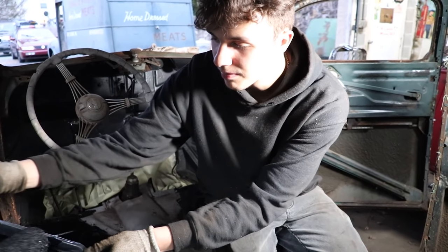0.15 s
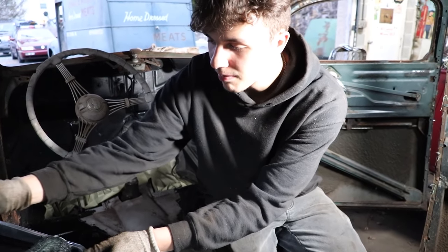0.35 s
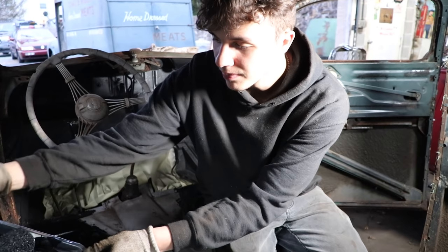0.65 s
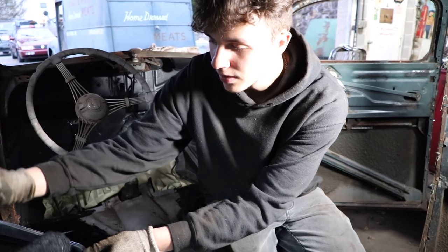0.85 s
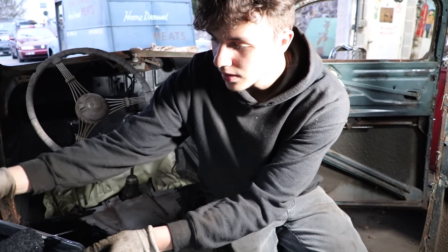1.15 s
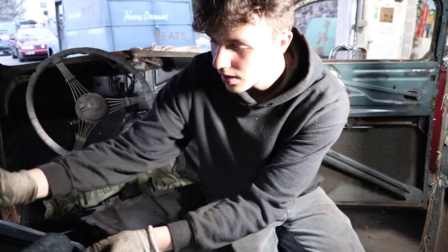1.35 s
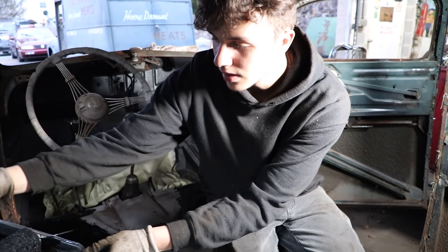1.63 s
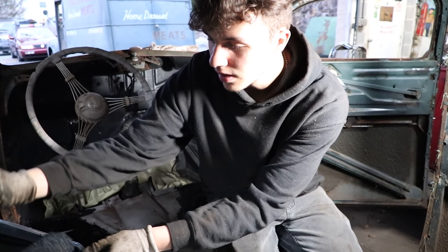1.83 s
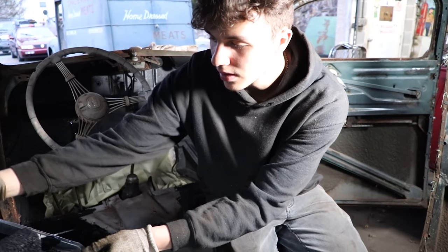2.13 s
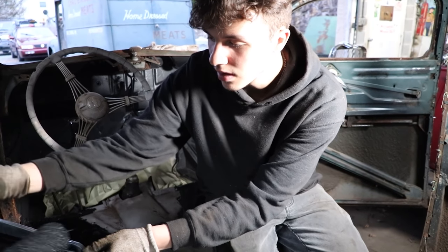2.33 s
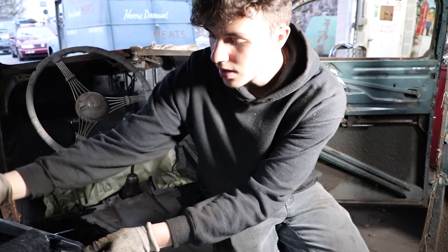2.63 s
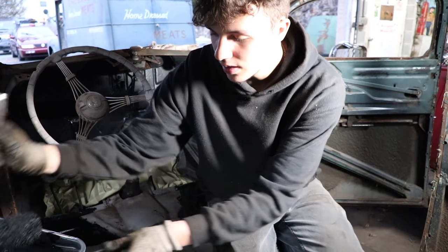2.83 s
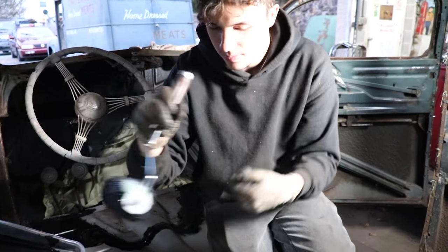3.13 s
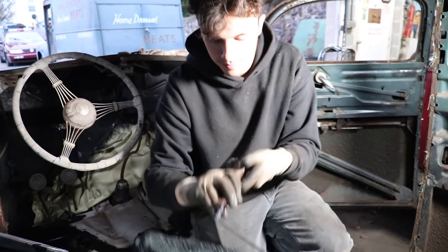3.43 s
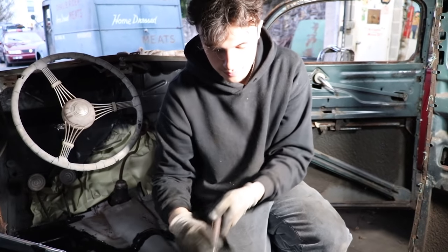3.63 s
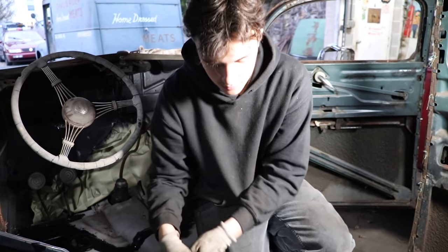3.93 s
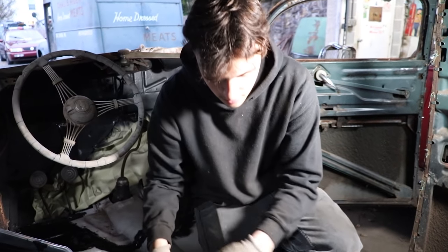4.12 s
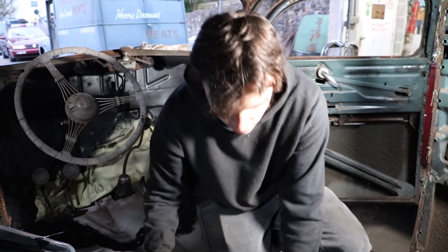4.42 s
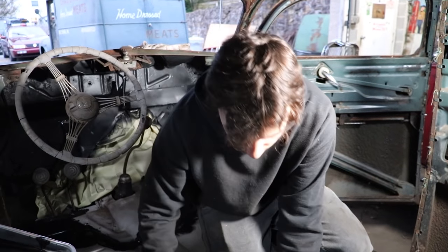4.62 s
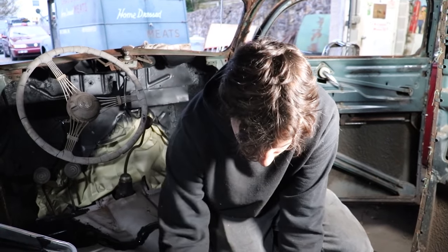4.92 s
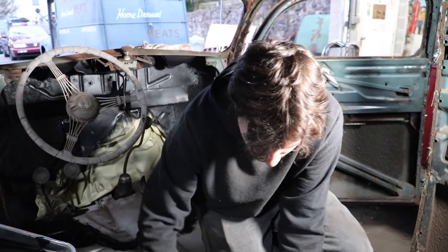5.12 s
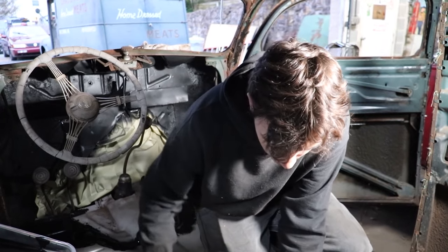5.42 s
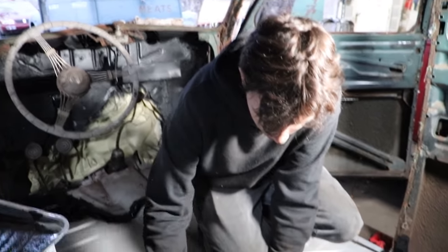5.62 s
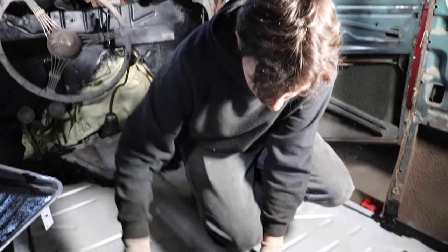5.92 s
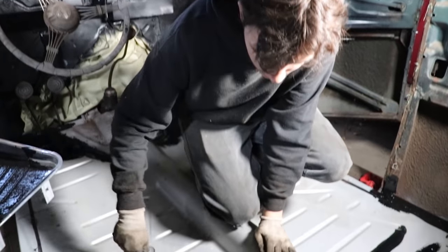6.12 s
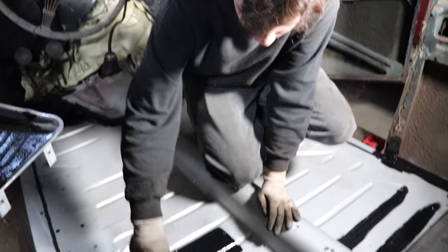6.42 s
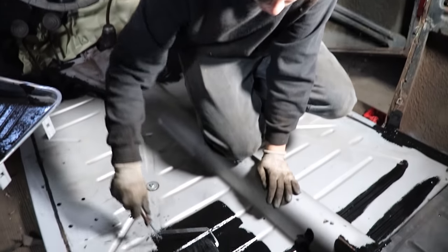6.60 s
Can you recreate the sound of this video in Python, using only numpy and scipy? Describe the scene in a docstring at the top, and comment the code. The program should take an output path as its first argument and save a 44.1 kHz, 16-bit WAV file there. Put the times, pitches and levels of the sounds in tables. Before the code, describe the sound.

A thick paint roller peels wetly back and forth in a plastic tray, knocks, lifts, then lands and rolls over booming ribbed sheet steel.

```python
"""In a garage, a thick-nap paint roller works in a plastic tray, is lifted, set down on a steel floor pan and rolled.
Wet nap peels with a tacky crackle of noise grains, and single paint threads snap as clicks a few cycles long.
The roller knocks on the tray and jolts on the steel: cracks and noise rattles ring each body's modes.
The steel pan booms over its ribs with rising twangs and deep modes; the axle squeaks faintly.
Behind them lie quiet air noise and a wavering hum; a short diffuse tail stands for the walls."""
import sys
import numpy as np
from scipy import signal
from scipy.io import wavfile

SR = 44100
rng = np.random.default_rng(int(sys.argv[2]) if len(sys.argv) > 2 else 0)


def transcribe(u):
    """Save the signal u as a 16-bit wav file named by the first command-line argument.

    u: samples, shape (n,) or (channels, n), limited to [-1, 1]; the rate is SR.
    q: integer samples, one column per channel.
    """
    v = np.clip(np.atleast_2d(u).T, -1, 1)
    q = np.round(v * 32767).astype(np.int16)
    wavfile.write(sys.argv[1], SR, q)


N = 298116  # length in samples

# The pan pops over a rib. Each row: time in seconds, level in dB before the twang's trim,
# share of the deep modes in dB over that level.
BOOMS = [(4.568, -27, -14), (4.879, -30, 1), (5.211, -34, -2), (5.304, -26.5, -4.5), (5.573, -15.5, -27),
         (5.672, -35.5, 8), (5.952, -39, -6), (6.083, -27, -6), (6.231, -12, -8.5), (6.301, -30, 0)]


def amp(db):
    """dB to gain."""
    return 10 ** (np.asarray(db) / 20)


def rms_one(x):
    """Scale to rms 1."""
    return x / np.sqrt(np.mean(x ** 2) + 1e-20)


def band(x, low, high):
    """Band-pass between two frequencies in Hz."""
    sos = signal.butter(2, [low, high], "band", fs=SR, output="sos")
    return signal.sosfilt(sos, x + 1e-18)


def drift(rate_hz):
    """Slow random wander of spread 1: noise through two equal one-pole smoothers."""
    step = 40  # drawn once every 40 samples, then interpolated
    r = np.exp(-2 * np.pi * step * rate_hz / SR)
    noise = rng.standard_normal(N // step + 2002)
    slow = signal.lfilter([1], [1, -2 * r, r * r], noise)[2000:]  # skip the filter's start-up
    return np.interp(np.arange(N) / step, np.arange(len(slow)), rms_one(slow))


def ring(x, hz, t60):
    """A damped resonance: a unit click starts a dying sine of height 1."""
    r = amp(-60 / (t60 * SR))
    w = 2 * np.pi * hz / SR
    return signal.lfilter([0, np.sin(w)], [1, -2 * r * np.cos(w), r * r], x + 1e-18)


def grains(per_s, spread_db):
    """Random clicks of uneven size and sign, scaled to rms 1."""
    sizes = amp(spread_db * np.minimum(rng.exponential(1, N), 5))
    signs = rng.choice([-1, 1], N)
    return rms_one(sizes * signs * (rng.random(N) < per_s / SR))


def coloured(source, spectrum, patchy_db):
    """Third-octave bands, neighbours on unrelated draws, each with its level and flicker; rms 1."""
    hz, db = np.transpose(spectrum)
    edges = 20 * 2 ** np.arange(0, 9.8, 1 / 3)
    out = 0
    for k, (low, high) in enumerate(zip(edges, edges[1:])):
        if hz[0] <= high and low <= hz[-1]:
            level_db = np.interp(np.log(low * high) / 2, np.log(hz), db)
            flicker_db = patchy_db * drift(13.0)
            out = out + amp(level_db + flicker_db) * band(source[k % 2], low, high)
    return rms_one(out)


def motion(table):
    """Power of peeling, treble, rumble and boom: each stroke speeds up, surges at its fastest and slows."""
    # Powers on the half sine of a stroke's speed, for peeling, treble, rumble and boom.
    roundness = [0.52, 0.72, 0.41, 0.32]
    surge_s = 0.023  # half width of the surge
    t = np.arange(N) / SR
    power = np.full((4, N), 1e-12)
    for start, fastest, stop, *levels_db, surge_db in table:
        phase = np.interp(t, [start, fastest, stop], [0, .5, 1])
        speed = np.sin(np.pi * phase).clip(0) ** np.array(roundness)[:, None]
        surge = amp(surge_db * np.exp(-((t - fastest) / surge_s) ** 2))
        power += (amp(levels_db)[:, None] * speed * surge) ** 2
    return power


def nap(peel_db, treble_db, rumble_db):
    """Fibres tear free of the paint in clumps; drag shakes the body below; in the tray small blisters burst."""
    # Spectra of peeling in the thick pool, of peeling on the steel, and of the shaken body.
    # Each row: frequency in Hz, relative level in dB per Hz.
    pool_spectrum = [(710, -33), (1200, 6), (1510, -20), (1660, -1.5), (3950, -1), (7570, -21),
                     (13500, -16), (16000, -49)]
    steel_spectrum = [(710, -49), (1200, -5), (1630, -5), (2680, 3), (4860, -10.5), (8910, -21.5),
                      (13300, -19.5), (16000, -42)]
    rumble_spectrum = [(150, -12), (250, -1), (289, -2.5), (531, -9), (826, 0), (1190, -10), (1700, -10),
                       (2210, -31), (3740, -120)]
    lift_s = 2.95  # the roller leaves the pool of paint

    clumps = amp(1.4 * drift(94.0))
    tearing = [clumps * grains(12000., spread_db=3.5) for _ in range(2)]
    in_tray = np.arange(N) < lift_s * SR
    pool_peel = coloured(tearing, pool_spectrum, patchy_db=3.5)
    steel_peel = coloured(tearing, steel_spectrum, patchy_db=1.4)
    peel = np.where(in_tray, pool_peel, steel_peel)
    low, treble = [signal.sosfilt(signal.butter(4, 6000, side, fs=SR, output="sos"), peel)
                   for side in ("low", "high")]

    blisters = sum(band(grains(130.0, spread_db=5.0), hz, 1.33 * hz) * 3000. / hz
                   for hz in (2560, 2800, 3430, 4930, 6170))
    blisters = amp(6.5) * rms_one(blisters) * in_tray
    # single fibres let go
    ticks = amp(-9.5) * rms_one(band(grains(250., spread_db=6.5), 4100.0, 14000.0))
    bright = rms_one(treble) + ticks + blisters

    dragging = [grains(3000., spread_db=3.0) for _ in range(2)]
    rumble = coloured(dragging, rumble_spectrum, patchy_db=1.5)
    return amp(peel_db) * rms_one(low) + amp(treble_db) * bright + amp(rumble_db) * rumble


def blows(table, bands, modes, ring_db, longest_s, loss_db):
    """A sharp crack and a dying rattle, coloured blow by blow, heard directly and through the body's modes."""
    # Factors on the rattle's t60, band by band from the lowest: highs die first.
    rattle_share = [2.3, 1.27, 1.3, 1.05, 0.92]
    # crack of a blow that rattles 0.1 s; the shorter the rattle, the harder the crack
    crack_at_tenth_db, crack_db_per_halving = 5, 3.5
    push = np.zeros((5, N + 16000))
    t = np.arange(16000) / SR
    rebound = SR // 940  # delay in samples
    for s, peak_db, low_db, mid_db, high_db, top_db, t60 in table:
        t60 = max(t60, .01)
        crack_db = crack_at_tenth_db - crack_db_per_halving * np.log2(t60 * 10)
        decay = amp(-60 * t / (t60 * np.array(rattle_share)[:, None]))
        rattle = decay * rng.standard_normal(len(t))
        # the softer the contact, the slower the rise
        rattle *= 1 - np.exp(-t / (0.00036 * amp(-crack_db)))
        # crack and quick rebound, in the middle bands
        rattle[1:4, [0, rebound]] = [5.5 * amp(crack_db), 0.87 * amp(crack_db)]
        band_db = np.array([[low_db], [0], [mid_db], [high_db], [top_db]])
        i = round(s * SR)
        push[:, i:i + len(t)] += amp(peak_db - loss_db + band_db) * rattle

    direct = 0
    for p, (low, high) in zip(push, bands):
        narrow_gain = np.sqrt(SR / 2 / (high - low))  # makes up for the width of the band
        direct = direct + narrow_gain * band(band(p[:N], low, high), low / 1.175, high * 0.95)
    # no contact is infinitely hard
    direct = signal.sosfilt(signal.butter(1, 6000., fs=SR, output="sos"), direct)
    ringing = sum(amp(db) * ring(direct, hz, min(t60, longest_s)) for hz, db, t60 in modes)
    return direct + amp(ring_db) * ringing


def shaking_after(table, loss_db, t60):
    """Power that swells after every blow and dies away."""
    rise_s = 0.0091  # time constant of the swell
    kicks = np.zeros(N)
    for s, peak_db, *_ in table:
        kicks[round(s * SR)] += amp(peak_db + loss_db) ** 2
    rise = np.exp(-1 / (rise_s * SR))
    dying = signal.lfilter([1], [1, -amp(-60 / (t60 * SR)) ** 2], kicks)
    return signal.lfilter([1 - rise], [1, -rise], dying)


def pan(boom_db):
    """The sheet shakes under the roller and pops over each rib: a rising twang, then the deep modes ring."""
    # Flexing modes of the sheet. Each row: frequency in Hz, relative level in dB, t60 in seconds.
    flex_modes = [(42, -10, 0.13), (60, -9, 0.26), (92, 0, 0.41), (120, 1, 0.059), (168.5, 1, 0.2),
                  (216.8, -8.5, 0.31)]
    twang, thump = np.zeros(N + 8000), np.zeros(N)
    t = np.arange(8000) / SR
    hz = 170. - 98.4 * np.exp(-t / 0.014)  # the sheet tightens as it springs back
    envelope = (1 - np.exp(-t / 0.015)) * amp(-60 * t / 0.19)
    shape = np.sin(2 * np.pi * np.cumsum(hz) / SR) * envelope
    for s, db, deep_db in BOOMS:
        i = round(s * SR)
        twang[i:i + len(t)] += amp(db + 0.5) * shape
        thump[i] = amp(db + deep_db)
    shaking = rng.standard_normal(N)
    out = twang[:N]
    for k, (hz, db, t60) in enumerate(flex_modes):
        shaken = amp(boom_db - 6.5) * rms_one(ring(shaking, hz, t60))
        popped = ring(thump, hz, t60) * (hz < 110)  # a pop rings the deep modes only
        out = out + (-1) ** k * amp(db) * (shaken + popped)
    return band(out, 25.0, 340.0)


def snaps():
    """Each parting paint thread is a click a few cycles long."""
    # Each row: time in seconds, level in dB before the trim, pitch in Hz.
    threads = [(0.0343, -40, 3870), (0.106, -32, 5430), (0.1324, -28, 3970), (0.6417, -25, 4150),
               (0.7475, -27, 9210), (1.1837, -26, 3800), (1.4717, -23.5, 5240), (1.5293, -26, 4160),
               (1.593, -19.5, 3680), (1.6585, -24, 4140), (1.841, -31, 5460), (1.848, -33, 4490),
               (2.085, -23.5, 3840), (2.4874, -34, 4070), (2.6257, -21, 3880), (2.723, -27, 4300),
               (2.777, -19.5, 4170), (3.6397, -23, 11500), (4.2223, -30.5, 6560), (4.6513, -26, 4070),
               (4.679, -21, 4700), (4.8209, -25, 5860), (5.7364, -23, 3900), (5.9444, -28, 4730),
               (6.667, -24, 4720), (6.6776, -18, 4700)]
    out = np.zeros(N + 400)
    t = np.arange(400) / SR
    for s, db, hz in threads:
        i = round(s * SR)
        cycles = t * hz
        click = cycles * np.exp(-cycles / 0.84) * np.sin(2 * np.pi * cycles)
        out[i:i + len(t)] += amp(db + 5.5) * click
    return out[:N]


def squeaks():
    """Dry rubbing at the axle: noise in a narrow resonance that swells and fades at one pitch."""
    # Each row: start in seconds, length in seconds, pitch in Hz, rms level at the top of the swell in dB.
    rubs = [(1.284, .06, 4570, -59), (1.907, .03, 5535, -56), (3.367, 0.1, 2190, -54),
            (3.99, 0.037, 460, -41), (4.125, .17, 4680, -61), (4.148, 0.037, 4000, -59),
            (3.7, .08, 2250, -58), (6.226, 0.022, 5400, -54)]
    out, t = np.zeros(N), np.arange(N) / SR
    for s, length, hz, db in rubs:
        swell = np.sin(np.pi * np.clip((t - s) / length, 0, 1))
        out += amp(db) * swell * rms_one(ring(rng.standard_normal(N), hz, 0.06))
    return out


def walls(x, t60, dull_hz):
    """A short diffuse tail: dying noise, duller than the direct sound."""
    t = np.arange(SR // 2) / SR
    tail = rng.standard_normal(len(t)) * amp(-60 * t / t60) * (t > .006)
    tail = signal.sosfilt(signal.butter(1, dull_hz, fs=SR, output="sos"), tail)
    return signal.fftconvolve(x, tail / np.sqrt(np.sum(tail ** 2)))[:N]


def garage():
    """Gently flickering air noise, and a hum: a low tone that wavers under noise in narrow resonances."""
    # Spectrum of the air. Each row: frequency in Hz, relative level in dB per Hz.
    air_spectrum = [(12, -39), (20, 6), (38, -8), (65, 2.5), (83, -25), (113, -20), (150, -6.5), (193, -3),
                    (241, -7.5), (472, -9.5), (873, -4), (1530, -20), (2820, -13.5), (7520, -33.5),
                    (14700, -30.5), (16000, -45)]
    # A far fan. Each row: frequency in Hz, resonance width in Hz, rms level in dB.
    fan = [(73.5, 23, -61.5), (141.3, 7.6, -56), (237.5, 9, -56.5), (364.6, 21, -63)]
    air = amp(-49.5) * coloured(rng.standard_normal((2, N)), air_spectrum, patchy_db=1.9)
    tone_hz = 69. + 1.19 * drift(2.7)
    tone = amp(-48.0 + 2.7 * drift(1.65)) * np.sin(2 * np.pi * np.cumsum(tone_hz) / SR)
    hum = sum(amp(db) * rms_one(ring(rng.standard_normal(N), hz, 2.04 / width)) for hz, width, db in fan)
    return air + tone + hum


def scene():
    """Strokes and blows drive the nap, the bodies and the pan; blows, snaps and squeaks reach the walls."""
    # Pushes out and back in the tray, then up to three to a stroke over the ribbed steel; and
    # the lifted roller rustling as it is carried. Each row: start, fastest point and stop in seconds,
    # then peeling, treble, rumble, boom of the pan (before its trim) and surge at the fastest point in dB.
    strokes = [(-.12, .05, 0.18, -49, -60.5, -52, -60, 1), (.21, .25, .37, -55, -75, -52, -58, 2),
               (.39, .47, 1.4, -50, -61, -60, -68, -0.5), (.73, .82, .9, -53, -71, -48.5, -55, -10),
               (.935, .99, 1.31, -49, -60, -48, -70, 8), (1.26, 1.36, 1.44, -53, -69, -53, -61, -6),
               (1.46, 1.52, 1.91, -47, -61.5, -55, -62, 1), (1.75, 1.86, 2.04, -52, -72, -51.5, -58, 3.5),
               (1.96, 2.11, 2.26, -48.5, -61.5, -51.5, -59, 3.5),
               (2.26, 2.37, 2.45, -53.5, -80, -44, -51.5, 5), (2.51, 2.565, 2.79, -43.5, -60, -48, -62, 10),
               (4.57, 4.66, 4.77, -46.5, -52, -45.5, -39, -1), (4.75, 4.9, 4.95, -43, -53, -42, -42, 4),
               (4.92, 4.98, 5.045, -42, -57, -45, -42, 2),
               (5.065, 5.222, 5.31, -42.5, -56, -45.5, -44.5, 3),
               (5.27, 5.4, 5.46, -44, -53.5, -47, -42.5, 1), (5.47, 5.7, 5.83, -40, -53, -42, -49, 5.5),
               (5.85, 5.98, 6.04, -42.5, -54.5, -45, -43.5, 5.5), (6.03, 6.1, 6.18, -44, -56, -46, -47, 1),
               (6.17, 6.26, 6.33, -43, -52, -43.5, -42, 3), (6.27, 6.34, 6.48, -39, -49.5, -42, -41, 5.5),
               (6.36, 6.41, 6.37, -38.5, -61, -46.5, -37, -0.5),
               (6.5, 6.545, 6.61, -44, -56, -48, -43, 1.5), (6.57, 6.62, 6.68, -42.5, -58, -48.5, -48, 4),
               (6.63, 6.69, 6.8, -42.5, -51.5, -50, -47, 3)]
    rustles = [(2.95, 3.15, 3.3, -68, -67, -49, -50.5, -2), (3.268, 3.33, 3.54, -60, -72, -45, -52, -6),
               (3.647, 3.787, 3.77, -56, -64, -53.5, -54, 12), (3.835, 3.94, 3.9, -71, -73, -54.5, -55, 3),
               (3.995, 4.098, 4.14, -51.5, -71, -51.5, -64, 6.5),
               (4.13, 4.196, 4.36, -60, -70, -56.5, -58, -5), (4.385, 4.42, 4.75, -46, -79, -48, -58, -0.5)]
    # Cage knocks on the tray; roller and frame landing and jolting on the steel. Each row: time in seconds,
    # level in dB before the loss, then low, mid, high and top band in dB over it (the second-lowest
    # band sits at the level itself), and rattle t60 in seconds before the share of each band.
    knocks = [(0.149, -31.5, -30, -7, -22, -29, 0.13), (0.175, -27, -27, 2.5, -0.5, -39, 0.089),
              (0.211, -26, -22, -4, -12, -10.5, 0.097), (0.356, -34.5, -14, -9, -14, -28, 0.06),
              (0.396, -40.5, -26, 0, 4, -1, 0.16), (0.42, -20.5, -23, -13, -6, -19, 0.066),
              (0.457, -34, -10, 3.5, 6.5, 5.5, 0.13), (0.692, -32.5, -13, -14, -24, -26, 0.096),
              (0.722, -26.5, -30.5, 2, -6, -34, 0.068), (0.933, -41.5, -12, -5.5, 4, -5, 0.084),
              (0.954, -35, -7, -5, 3, -1, 0.13), (0.988, -23, -10, -6, -4.5, -32, 0.084),
              (1.014, -36, -15, 3, 8.5, 2, 0.11), (1.249, -25.5, -21, 3.5, -1, -39, 0.092),
              (1.366, -38, -30, -4.5, -3, -13, 0.32), (1.451, -28, -29, -12, -8, -22, 0.11),
              (1.484, -23.5, -15, -8, -5.5, -34, 0.14), (1.743, -19, -44, 6.5, -1, -25, 0.072),
              (1.964, -24.5, -10, -5, -2.5, -9, 0.12), (2.266, -16, -39, 2, -3.5, -23, 0.073),
              (2.472, -29, -12, -10, -11, -16, 0.066), (2.521, -35, -20, -3, 2, -3, 0.19),
              (2.528, -17, -12.5, -16, -3, -11, 0.15), (2.533, -19.5, -5, -7, -1, -8, 0.055),
              (2.562, -22.5, -10, 2.5, 4.5, 1.5, 0.11), (2.778, -37, -12, -7, -1, -6, 0.097),
              (2.835, -26, -12.5, -12, -8, -13, 0.1), (3.091, -16.5, -12, -7, -5.5, -13, 0.1),
              (3.272, -17, -11.5, -5, -4, -12.5, 0.12), (3.439, -36, -7, -1, -0.5, -2, 0.12),
              (3.641, -30.5, -14, -2.5, -2.5, -8, 0.11), (3.944, -39, -26, 3, 3.5, -4, 0.076),
              (3.956, -33.5, -29, -2, -9, -3.5, 0.12), (4.088, -40, -8, -5, -5, -10, 0.11),
              (4.289, -33.5, -25, -7, -3.5, -27, 0.062)]
    jolts = [(4.369, -42, -5, -12, 27.5, -3, 0.046), (4.3727, -49, -5, -5, 25.5, -5, 0.066),
             (4.45, -10, -6, -39, -23, -44, 0.11), (4.457, -11, -1.5, -21, -6, -20, 0.1),
             (4.567, -28, -14, 15.5, 16, -6, 0.033), (4.573, -15.5, -11.5, -10, -14, -25, 0.2),
             (4.613, -34.5, 8, -22, -19, -20, 0.21), (4.782, -37, -6.5, -1, 7.5, 5, 0.13),
             (5.215, -20, -32, -6, -3, -20, 0.1), (5.3, -27.5, -28, -15, -18, -23, 0.11),
             (5.689, -31.5, -11, -12, -7, 2, 0.096), (5.977, -34, -27, -10, 11, -3, 0.06),
             (5.985, -24, -22, -12, 5.5, -7, 0.099), (6.329, -32.5, 1, -1, 6, 2, 0.21),
             (6.697, -28, -11, 1.5, 0, 2.5, 0.087)]
    # Colour bands of the blows. Each row: lower edge in Hz, upper edge in Hz.
    tray_bands = [(220, 700), (700, 1550), (1550, 2500), (2500, 4800), (4800, 14000)]
    steel_bands = [(220, 600), (600, 1350), (1350, 2400), (2400, 4800), (4800, 14000)]
    # Body modes. Each row: frequency in Hz, relative level in dB, t60 in seconds before the longest_s limit.
    tray_modes = [(669, -7, 0.077), (936, -14, 0.021), (1123, -14.5, 0.018), (1345, -2.5, 0.028),
                  (1485, -5.5, 0.029), (1977, -20.5, 0.07), (2524, -12.5, 0.11), (2867, -2.5, 0.068)]
    steel_modes = [(227.7, -0.5, 0.59), (289, -8.5, 0.31), (393, -11.5, 0.37), (466.5, -10.5, 0.38),
                   (673.4, -13, 0.33), (943, -4, 0.061), (1210, -9, 0.062), (1750, -6, 0.03),
                   (2840, -2, 0.05), (3170, 0, 0.052)]
    # Shaking after a blow: each holds gain in dB on the blow's listed level, t60 in seconds.
    tray_shake = (-24, 0.36)
    steel_shake = (-16.5, 0.31)
    thud_shake = (-33, 0.42)
    pan_shake = (-12, 0.74)

    peel, treble, rumble, boom = motion(strokes + rustles)
    rumble = rumble + shaking_after(knocks, *tray_shake) + shaking_after(jolts, *steel_shake)
    boom = boom + shaking_after(jolts, *thud_shake) + shaking_after(BOOMS, *pan_shake)
    peel_db, treble_db, rumble_db, boom_db = 10 * np.log10([peel, treble, rumble, boom])

    hits = blows(knocks, tray_bands, tray_modes, ring_db=-35.5, longest_s=0.068, loss_db=8.0)
    hits += blows(jolts, steel_bands, steel_modes, ring_db=-39.0, longest_s=0.15, loss_db=9.0)
    hits += snaps() + squeaks()
    wet = amp(-21.5) * walls(hits, t60=0.16, dull_hz=2980.0)
    mix = hits + wet + nap(peel_db, treble_db, rumble_db) + pan(boom_db) + garage()
    return mix[None]


def record(dry):
    """Cut the top steeply: 60 dB down from 16.1 kHz upward."""
    return signal.sosfilt(signal.cheby2(14, 60, 16100, fs=SR, output="sos"), dry)


dry = scene()
out = record(dry)
transcribe(out)
```